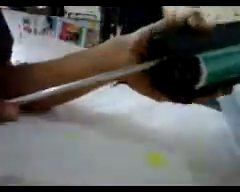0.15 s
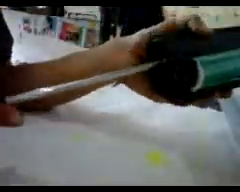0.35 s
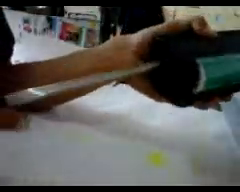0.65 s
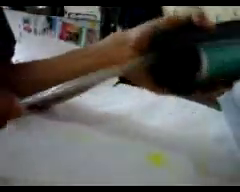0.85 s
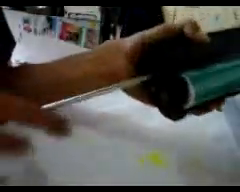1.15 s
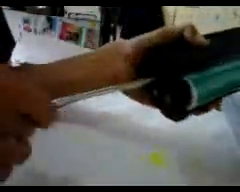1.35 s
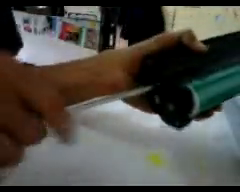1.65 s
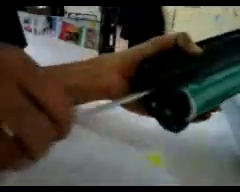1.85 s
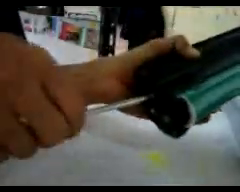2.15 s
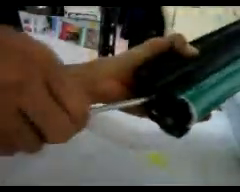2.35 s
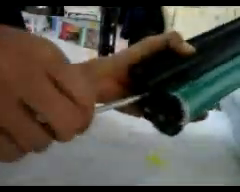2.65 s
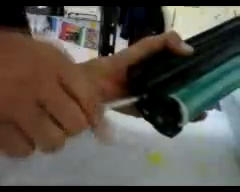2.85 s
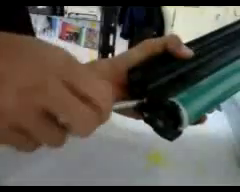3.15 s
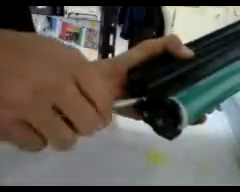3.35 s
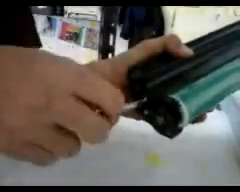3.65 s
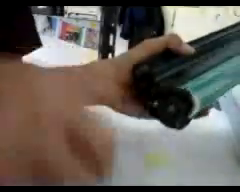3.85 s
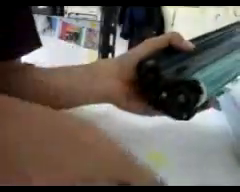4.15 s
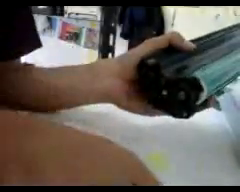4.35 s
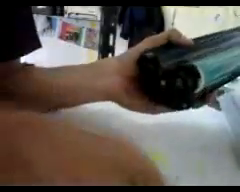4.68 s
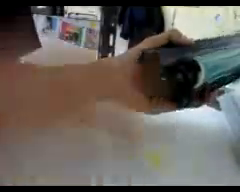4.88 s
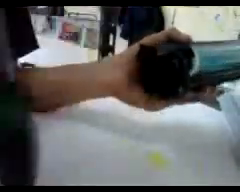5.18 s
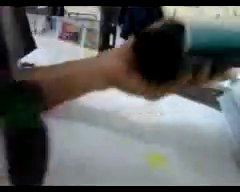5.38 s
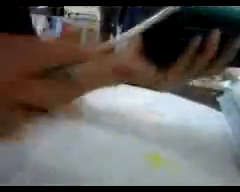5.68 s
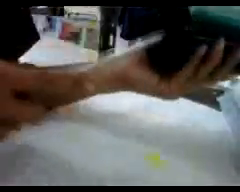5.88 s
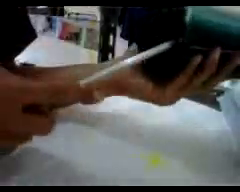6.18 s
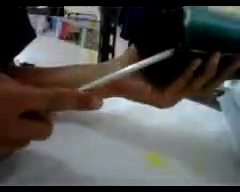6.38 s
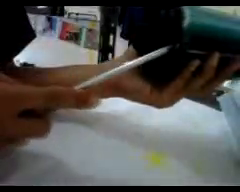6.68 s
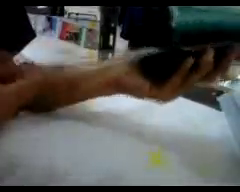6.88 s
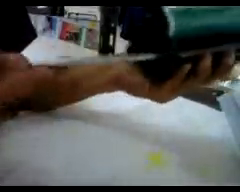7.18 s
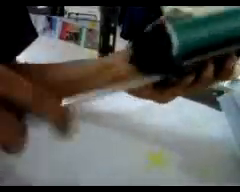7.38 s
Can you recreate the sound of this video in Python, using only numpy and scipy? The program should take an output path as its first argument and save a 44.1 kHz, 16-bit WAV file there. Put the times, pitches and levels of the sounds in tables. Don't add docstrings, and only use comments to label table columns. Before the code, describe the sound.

A screwdriver picks at a hollow plastic cartridge: one sharp snap early, then sparse small ticks while a lorry booms past. Past four seconds, tools land hard on the wooden bench, rattling loose parts, and a hollow handle drops with a loud ringing clunk. Lighter prying clicks follow. Open street-side workshop, low traffic hum, small dull camera microphone lying on the bench, overdriven by the knocks.

```python
import sys
import numpy as np
from scipy import signal
from scipy.fft import rfft, irfft, next_fast_len
from scipy.io import wavfile
from scipy.ndimage import uniform_filter1d

SR = 44100
rng = np.random.default_rng(int(sys.argv[2]) if len(sys.argv) > 2 else 0)


def elevation(decibels):
    levels = np.asarray(decibels, float)
    return 10 ** (levels / 20)


def wav_out(sig):
    wavfile.write(sys.argv[1], SR, np.round(np.clip(np.atleast_2d(sig).T, -1, 1) * 32767).astype(np.int16))


N = 332073

# pitch_hz [Hz], level_db [dB], t60_s [s]
SHELL_MODES = [(1480, -4.5, 0.062), (1678, -1, 0.1), (1853, -7, 0.057), (2134, -6, 0.037),
               (2240, -10, 0.017), (2510, -7, 0.041), (2845, -9, 0.088), (3130, -12, 0.018),
               (3935, -6.5, 0.05), (3550, -6.5, 0.11), (4510, -3.5, 0.044), (5170, -6, .03),
               (5640, -9.5, 0.03), (6380, -5, 0.03)]


def unit(x):
    return x / np.sqrt(np.mean(x ** 2))


def walk(rate_hz):
    k = int(SR / rate_hz)
    held = np.repeat(rng.standard_normal(N // k + 1), k)
    return 1.59 * uniform_filter1d(uniform_filter1d(held, k), k)[:N]


def bell(noise, centre_hz, octaves):
    f = np.maximum(np.arange(len(noise) // 2 + 1) * SR / len(noise), 1)
    colour = np.exp(-.5 * (np.log2(f / centre_hz) / octaves) ** 2)
    return unit(irfft(rfft(noise) * colour, len(noise)))


def spread(table, hz):
    f, db = np.transpose(table)
    return np.interp(np.log(hz), np.log(f), db)


def curves(table):
    s, *columns = np.transpose(table)
    return [np.interp(np.arange(N) / SR, s, c) for c in columns]


def with_ring(events, share, per_db, per_octave):
    ringing = []
    for event in events:
        ring = share + per_db * (event[1] + 30) + per_octave * event[2]
        ringing.append((*event, np.clip(ring, .2, 1.1)))
    return ringing


def strikes(events, modes, pivot_hz, size, scatter_db, split, crack_db, blur, crack_t60, rise_ms):
    out, t = np.zeros(N + size), np.arange(size) / SR
    f = np.arange(size // 2 + 1) * SR / size
    hz, mode_db, t60 = np.repeat(np.transpose(modes), 2, axis=1)[:, :, None]
    chance = rng.standard_normal((len(events), 2, len(hz), 1))
    noise = rng.standard_normal((len(events), 2, size))
    for event, (strength, detune), (grit, dense) in zip(events, chance, noise):
        s, db, centre, width, chatter_ms, ring = event
        octaves_off = np.log2(hz / pivot_hz) - centre
        touch = elevation(mode_db) * np.exp(-.5 * (octaves_off / max(width, .15)) ** 2)
        fade = np.log(1000) * t / max(ring, .1)
        tones = np.exp(-fade / t60) * np.sin(2 * np.pi * hz * (1 + split * detune) * t)
        body = np.sum(touch * elevation(scatter_db * strength) * tones, axis=0)
        crowd = np.sqrt(np.sum(touch ** 2 / (1 + ((f - hz) / (blur * hz)) ** 4), axis=0))
        crack = unit(irfft(rfft(dense) * crowd, size)) * np.exp(-fade / crack_t60)
        body = body / abs(body).max() + elevation(crack_db) * crack
        body *= 1 - np.exp(-t * 1000 / (rise_ms * 2. ** -centre))
        chatter = 0.2 * grit * (abs(grit) > 2.3) * np.exp(-t * 1000 / max(chatter_ms, .5))
        chatter[0] = 1
        sound = signal.fftconvolve(body, chatter[:SR // 20])[:size]
        i = int(s * SR)
        out[i:i + size] += elevation(db) * sound / abs(sound).max()
    return out[:N]


def near_cap_prying():
    touches = [(.348, -23, -0.21, 0.37, 1.8), (.3508, -10.5, 0.48, 0.74, 0.96),
               (.351, -20, .95, 0.13, 0.78), (.3565, -18.5, -0.093, 0.27, 3.9),
               (.3625, -24.5, 0.21, 0.3, 3.2), (.665, -31, -0.11, 0.78, 2.2),
               (.807, -41.5, 1.17, 0.18, 1.8), (.856, -44, -0.19, 0.46, 21), (.899, -36.5, 2.2, 2.5, 8),
               (.973, -38, -0.072, 1.2, 1.5), (1.2395, -41, -1.5, 2.1, 2.3),
               (1.446, -40.5, -0.43, 1.2, 3.4), (1.697, -29, -0.85, 1.1, 3.2),
               (1.868, -34.5, 1.1, 1.1, 3.5), (2.267, -39, 0.34, 2.4, 4), (2.4435, -33, 2.3, 2.78, 6.5),
               (2.581, -24.5, 0.93, 0.63, 9.2), (2.5855, -31.5, 1.7, 0.71, 4.4), (3.10, -37, 1.4, 0.34, 4),
               (3.149, -35.5, 1.2, 0.13, 4.1), (3.638, -41, 1.2, 0.84, 5.1), (3.909, -41, 1.3, 1.5, 2.9)]
    return strikes(with_ring(touches, share=0.77, per_db=0.0047, per_octave=-.03), SHELL_MODES, 1960, SR // 8,
                   scatter_db=2.5, split=.0075, crack_db=-0.5, blur=0.03, crack_t60=0.034, rise_ms=1.3)


def far_cap_prying():
    touches = [(6.438, -35.5, 0.04, 0.16, 3), (6.4383, -33, 0.78, 0.19, 2.5),
               (6.4425, -32.5, 0.018, 0.43, 2.5), (6.449, -38.5, 0.31, 0.44, 2.7),
               (6.756, -24, .96, 0.14, .7), (6.7562, -29, 0.04, 0.2, 6.2), (6.7572, -30, 1.5, 0.68, 2),
               (6.7655, -32, 0.053, 0.37, 3), (6.772, -38, 1.5, 0.57, 3), (6.975, -37.5, 0.12, 0.41, 2.6),
               (7.077, -33.5, 0.87, 0.8, 4.7), (7.095, -43, 1.26, 0.42, 4), (7.272, -46.5, 1.5, 0.55, 4),
               (7.376, -47, 0.36, .57, 4), (7.393, -42, 0.18, .5, 5), (7.416, -41.5, 1.6, 0.43, 3.6),
               (7.439, -33.5, 1.9, 1, 9.8)]
    cap_modes = [(1690, 1.5, 0.056), (1794, -17, 0.028), (1855, -9, 0.033), (1923, 1, 0.048),
                 (2055, -5, 0.031), (2650, -2, .04), (2870, 1, 0.053), (3270, -13, 0.039),
                 (3476, -6.5, .035), (3675, -0.5, .07), (3880, -14.5, 0.092), (4190, -0.5, 0.036),
                 (4880, -1, 0.034), (5650, -3, .025)]
    return strikes(with_ring(touches, share=0.9, per_db=0.011, per_octave=-0.13), cap_modes, 1810, SR // 8,
                   scatter_db=1.25, split=.005, crack_db=-9.0, blur=0.035, crack_t60=0.026, rise_ms=0.75)


def bench_knocks():
    # start_s [s], level_db [dB peak], colour_oct [octaves from 300 Hz], width_oct [octaves], chatter_ms [ms]
    tools = [(4.2078, -7, 1.3, 1.73, 4.9), (4.2186, -9, -0.54, 0.82, 1.3), (4.2304, -12.5, 0.23, 1.2, 1.8),
             (4.271, -36.5, 3, 2.9, 6), (4.277, -24, -0.66, 0.76, 6.2), (4.366, -34, 0.75, 0.86, 3.3),
             (4.452, -44.5, 0.8, 0.47, 4), (4.468, -34.5, 2.1, 1.1, 8), (4.481, -42.5, 1.5, 0.25, 3),
             (4.494, -29.5, 1.03, 0.6, 0.6), (4.547, -39.5, 1.2, 2, 6.1), (4.799, -41, 2.5, 0.84, 14.6),
             (4.821, -34.5, 1.65, 0.52, 10), (4.834, -20.5, -0.9, 2.1, 1.1), (4.885, -20.5, 2.5, 1.2, 11),
             (4.8975, -15, -0.4, 0.88, 0.71), (4.997, -39.5, 1.9, 0.14, 4.2), (5.018, -37.5, 0.4, 1, 5.4),
             (5.077, -27, 0.88, 1.1, 3.9), (5.084, -21, 0.1, 1.26, 2)]
    # start_s [s], level_db [dB peak], colour_oct [octaves from 300 Hz], width_oct [octaves], chatter_ms [ms]
    nudges = [(.351, -26.5, 1, 0.14, 2.2), (.359, -26.5, 0.96, .16, 0.78), (1.24, -38.5, 0.92, 0.26, 22),
              (.666, -40.5, 0.62, 0.36, 10), (2.581, -27.5, 0.54, 0.93, 5.3), (3.0365, -29, 1.8, 0.87, 3.7),
              (3.041, -30.5, 0.82, 0.6, 2.2), (3.0475, -26.5, 1.3, .2, 1.4), (6.605, -45, -1.3, .5, 4.9),
              (6.766, -39.5, 1.65, 0.33, 8.8), (7.305, -41.5, -1.43, 0.43, 9.2)]
    bench_modes = [(83.2, 5, 0.18), (174.6, 4, 0.069), (259, -6, 0.08), (308.7, -8.5, 0.16),
                   (360.3, -10.5, 0.1), (465, -16, 0.05), (556, -6, 0.076), (620, -7.5, .07),
                   (679, -7, 0.062), (795, -14.5, 0.07), (1054, -16.5, 0.051), (1250, -9, 0.029),
                   (1477, -12, 0.033), (1690, -23, 0.032)]
    blows = with_ring(nudges + tools, share=0.63, per_db=0.0045, per_octave=-0.011)
    return strikes(blows, bench_modes, 289, SR // 4, scatter_db=2.5, split=.0075,
                   crack_db=-14, blur=0.16, crack_t60=0.077, rise_ms=1.24)


def handle_drop():
    bounces = [
        (5.4168, -7, 0.94, 0.7, 5.6),
        (5.426, -5.5, -0.28, 0.85, 0.59),
        (5.690, -29, -0.63, 0.81, 1.6),
        (5.713, -48, -1.8, 0.46, 3.3),
        (5.737, -41.5, -1.8, 2.4, 3.2),
    ]
    handle_modes = [(120, -5, 0.27), (207, -7.5, 0.14), (321.2, 1, 0.25), (366, -21, 0.12),
                    (427, -9.5, 0.11), (551, -8.5, 0.16), (622, -8, 0.11), (750, -16, 0.096),
                    (796, -14, 0.15), (886, -6, 0.036), (1270, -14, 0.46), (1482, 0, 0.2),
                    (1950, -9, 0.086)]
    return strikes(with_ring(bounces, share=0.32, per_db=0.022, per_octave=-0.41), handle_modes, 297, SR // 2,
                   scatter_db=1.25, split=.0025, crack_db=-17.0, blur=0.13, crack_t60=0.23, rise_ms=0.8)


def rattles():
    jumps = [(4.2075, -25, 0.23, 0.51, 5.6), (4.214, -41, 0.76, 0.75, 6.1), (4.221, -34, -0.19, .6, 4.4),
             (4.229, -33, 0.14, 0.55, 3.5), (4.238, -31.5, 0.75, 0.13, 2), (4.273, -47.5, 1.2, 1.4, 14),
             (4.468, -36.5, 0.93, 0.5, 5.5), (4.607, -43.5, 0.52, 0.66, 4), (4.612, -43.5, 1.13, 0.24, 3),
             (4.673, -42.5, 1.24, 0.13, 2.8), (4.698, -43, 1.1, .4, 7), (4.696, -45, -0.4, 0.19, 4.35),
             (4.822, -43, 1.1, 0.43, 7.7), (4.886, -31, .82, 0.66, 5.8), (5.018, -42, 0.92, 0.4, 3.9),
             (5.084, -47, 1.3, 0.88, 6), (5.416, -26, 0.53, 0.32, 18), (5.432, -39, 0.55, 0.51, 6.1),
             (5.448, -38.5, .75, 0.32, 4), (5.46, -38, .55, 0.17, 2.7), (5.486, -47.5, .8, 1.1, 6),
             (5.956, -48, 1.35, 0.54, 3.1), (6.099, -46.5, 0.97, 0.53, 4.4)]
    return strikes(with_ring(jumps, share=0.5, per_db=.004, per_octave=-.03), SHELL_MODES, 1910, SR // 8,
                   scatter_db=2.5, split=.015, crack_db=2.5, blur=0.14, crack_t60=0.04, rise_ms=1.7)


def shudders():
    shakes = [
        (5, -37, 78, 0.66, 0.47),
        (5.086, -35.5, 84, 0.41, 0.18),
        (5.431, -27.5, 378, 0.57, 0.36),
        (5.688, -32, 67, 0.95, 0.28),
        (3.7, -41, 47, .5, 0.45),
        (4.4, -32.5, 104, .4, .2),
        (5.55, -47, 35, .5, .9),
        (4.897, -32, 190, .4, 0.17),
        (4.835, -38, 230, 0.84, 0.17),
    ]
    age, out, uneven = np.arange(SR // 2) / SR, np.zeros(N), walk(30.)
    for s, db, hz, octaves, t60 in shakes:
        part = slice(int(s * SR), int(s * SR) + len(age))
        level = elevation(db - 60 * age / t60 + 2.6 * uneven[part])
        swell = 1 - np.exp(-age / .012)
        out[part] += level * swell * bell(rng.standard_normal(len(age)), hz, octaves)
    return out


def scrapes():
    drags = [(4.812, 4.845, -52, 4500, 0.35), (4.848, 4.875, -53, 4900, 0.13),
             (4.8, 4.875, -65.5, 2200, 0.64), (5.078, 5.096, -60, 2200, 0.74),
             (4.895, 4.95, -51, 3450, 0.55), (4.97, 5.198, -59.5, 4660, 0.36), (4.44, 4.52, -61, 410, 0.76),
             (4.6, 4.72, -68, 2700, 0.55), (3.09, 3.2, -57, 4800, 0.43), (3.635, 3.72, -57, 4400, 0.47),
             (3.72, 3.95, -63, 3100, 0.77), (5.7, 5.8, -65, 1800, 1.1), (7.36, 7.47, -64.5, 5100, .9),
             (0.98, 1.0, -58.5, 2800, 0.92), (4.206, 4.246, -44, 600, 1.5),
             (5.416, 5.463, -39.5, 760, 0.77), (6.752, 6.86, -56, 8200, 1), (4.2015, 4.208, -42, 1600, .7),
             (4.874, 4.886, -48.5, 1900, 1), (4.63, 4.69, -59.5, 610, .5), (4.796, 4.81, -59, 4900, .2),
             (4.245, 4.3, -65.5, 5200, .3), (.335, .349, -50, 4200, 0.51), (4.95, 5.078, -61, 600, 1.1),
             (2.579, 2.592, -46, 4000, .9), (4.268, 4.3, -70, 1500, .8), (4.34, 4.46, -63.5, 4600, 0.34),
             (2.12, 2.32, -58, 1750, 0.36), (2.43, 2.47, -56.5, 1540, 0.3), (3.035, 3.075, -53, 670, 0.65),
             (0.82, 1.3, -62, 590, 0.19)]
    out, flutter, noise = np.zeros(N), elevation(1.8 * walk(120.)), rng.standard_normal(N)
    for start, end, db, hz, octaves in drags:
        part = slice(int(start * SR), int(end * SR))
        edge = signal.windows.tukey(part.stop - part.start, .08)
        out[part] += elevation(db) * edge * unit(flutter[part]) * bell(noise[part], hz, max(octaves, .1))
    return out


def lorry():
    # start_s [s], level_db [dB]
    pass_by = [(0, -63), (.3, -54.5), (.5, -71.5), (1.1, -60.5), (1.45, -49), (1.9, -55), (2.5, -47),
               (3.1, -49.5), (3.4, -54), (3.6, -55), (4.6, -60.5), (6.0, -74.5), (6.6, -59), (7.53, -77)]
    orders = [(1, 8), (2, -9.5), (4, 2), (6, -10.5), (8, -10), (10, -11.5)]
    engine_hz, boom_db, idle_db = 38.64, -54.5, -70
    t = np.arange(N) / SR
    rise, fall = (t - 2.15) / .6, (3.06 - t) / 0.27
    boom = np.clip(np.minimum(rise, fall) + 1, 0, 1)
    out = 0
    for multiple, order_db in orders:
        level_db = idle_db + (boom_db - idle_db) * boom if multiple == 1 else curves(pass_by)[0]
        phase = multiple * 2 * np.pi * engine_hz * t + walk(10.0)
        out = out + elevation(level_db + order_db + 3.2 * walk(14.)) * np.sin(phase)
    return out


def street():
    # pitch_hz [Hz], level_db [dB per Hz]
    colour = [(13, -37.5), (22, -11), (43, 1.5), (125, -5), (156, 1), (189, -11), (314, -10), (473, -12),
              (588, -14.5), (954, -24), (1400, -20), (3600, -23.5), (4270, -18.5), (6590, -30.5),
              (7090, -37.5), (9220, -65), (15600, -120)]
    # pitch_hz [Hz], width_hz [Hz], level_db [dB]
    resonances = [(104.5, 37, 8.5), (4740, 280, -0.5), (3930, 99, -7), (1360, 290, 3), (612, 99, 4.5)]
    # start_s [s], level_db [dB under its closest point]
    nearness = [(0, -5.5), (.45, -6), (.7, -6), (1.1, -2.5), (1.5, 0), (2.0, -0.5), (2.5, -0.5), (3.1, -1),
                (3.6, -3), (4.1, -5), (5.0, -7), (5.9, -8), (6.6, -7), (7.53, -6)]
    # level_db [dB at the closest point], loss [dB per dB of nearness]
    layers = [
        (-51.5, 0.53),
        (-53, 1.22),
        (-57, 0.98),
        (-56, 1.8),
    ]
    centres_hz = (60, 380, 1500, 4600)
    size = next_fast_len(N)
    f = np.maximum(np.arange(size // 2 + 1) * SR / size, 1)
    colour_db = spread(colour, f)
    for hz, width, db in resonances:
        colour_db = colour_db + db / (1 + (2 * (f - hz) / width) ** 2)
    noise = rfft(rng.standard_normal(size)) * elevation(colour_db) * (f < 7600)
    swells = np.array([db + slope * curves(nearness)[0] for db, slope in layers])
    ranges_hz = (25, 130), (180, 800), (800, 3000), (3000, 7000)
    power = [np.sum(abs(noise[(f > a) & (f < b)]) ** 2) * 2 / size ** 2 for a, b in ranges_hz]
    swells -= 10 * np.log10(power)[:, None]
    out = 0
    for hz in 20 * 2 ** np.arange(0, 9.1, .5):
        band = irfft(noise * np.clip(1 - 2 * abs(np.log2(f / hz)), 0, 1), size)[:N]
        place = np.interp(np.log(hz), np.log(centres_hz), range(4))
        share = np.clip(1 - abs(place - np.arange(4)), 0, 1)
        out = out + band * elevation(share @ swells + 1.1 * walk(9.))
    return out * elevation(1.0)


def room(x, t60_low, t60_high, split_hz):
    t = np.arange(SR // 2) / SR
    noise = rng.standard_normal(len(t))
    low = signal.sosfilt(signal.butter(2, split_hz, fs=SR, output="sos"), noise)
    tail = low * elevation(-60 * t / t60_low) + (noise - low) * elevation(-60 * t / t60_high)
    tail *= 1 - np.exp(-t / 0.017)
    return signal.fftconvolve(x, tail / np.sqrt(np.sum(tail ** 2)))[:N]


def scene():
    clicks = near_cap_prying() + far_cap_prying() + rattles()
    limit = elevation(-17.0)
    knocks = limit * np.tanh((bench_knocks() + handle_drop()) / limit)
    scattered = clicks * (.25 + walk(1800))
    near = clicks + knocks + elevation(-13.5) * room(scattered + knocks, 0.2, 0.28, 2500)
    near = signal.sosfilt(signal.butter(2, 5200, fs=SR, output="sos"), near)
    duck_db, release_s = -14.5, 0.21
    overload = signal.lfilter([1 / (0.035 * SR)], [1, -np.exp(-1 / (release_s * SR))], (knocks / limit) ** 2)
    far = scrapes() + elevation(duck_db * np.tanh(overload)) * (street() + lorry())
    return (near + far + shudders())[None]


def click_smear(x):
    bright = signal.sosfilt(signal.butter(2, 900, "highpass", fs=SR, output="sos"), x)
    frame = np.sqrt(np.maximum(uniform_filter1d(bright ** 2, int(0.02 * SR)), 0))
    return x + elevation(-18.0) * frame * bell(rng.standard_normal(N), 3100.0, 1.0)


def starve_treble(x):
    starved = [(0.306, 0.332, 530, -25), (0.618, 0.64, 3600, -15), (2.546, 2.552, 2200, -7.5),
               (4.173, 4.185, 4500, -14.5), (4.325, 4.328, 900, -9.5), (4.783, 4.791, 3100, -41),
               (5.361, 5.412, 500, -20), (5.54, 5.543, 1400, -17.5), (5.672, 5.707, 900, 0),
               (4.624, 4.662, 4000, -2), (6.714, 6.741, 3500, -30), (4.249, 4.265, 800, -6),
               (5.466, 5.482, 2100, -6.5), (3.96, 4.165, 4400, -4.5), (4.288, 4.31, 1000, 1.5)]
    t = np.arange(N) / SR
    for start, end, above_hz, db in starved:
        part = slice(int((start - .05) * SR), int((end + .05) * SR))
        highpass = signal.butter(6, above_hz, "highpass", fs=SR, output="sos")
        treble = signal.sosfiltfilt(highpass, x[part])
        inside = np.clip(np.minimum(t[part] - start, end - t[part]) / .005 + 1, 0, 1)
        x[part] -= (1 - elevation(db)) * np.sin(np.pi / 2 * inside) ** 2 * treble
    return x


def holes(x):
    mask_db, hole_db, scatter_db = -44, -24, 8
    frames = signal.stft(x, nperseg=1024)[2]
    bands = frames[:512].reshape(64, 8, -1)
    db = 10 * np.log10(np.mean(abs(bands) ** 2, axis=1) + 1e-18)
    margin = db - db.max(axis=0) - mask_db + scatter_db * rng.standard_normal(db.shape)
    gain = elevation(hole_db * np.clip(.5 - margin / 2, 0, 1))
    gain = np.vstack([np.repeat(gain, 8, axis=0), gain[-1:]])
    return signal.istft(frames * gain, nperseg=1024)[1][:N]


def top_cut(x):
    return signal.sosfilt(signal.butter(12, 7240, fs=SR, output="sos"), x)


def record(dry):
    x = holes(starve_treble(click_smear(dry[0])))
    x = signal.sosfilt(signal.ellip(12, .3, 75, 7200, fs=SR, output="sos"), x)
    x = x + elevation(-101) * rng.standard_normal(N)
    return top_cut(x[None])


dry = scene()
out = record(dry)
wav_out(out)
```